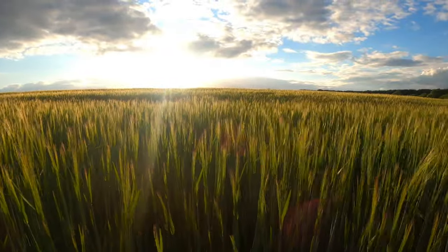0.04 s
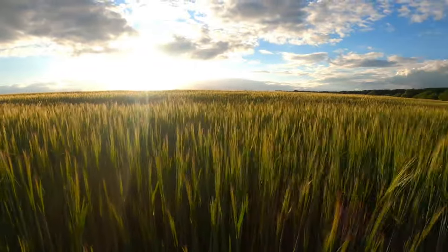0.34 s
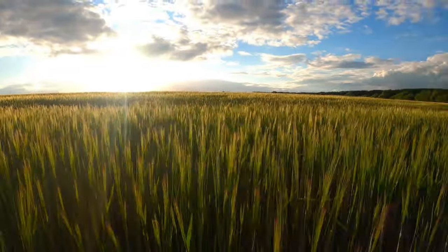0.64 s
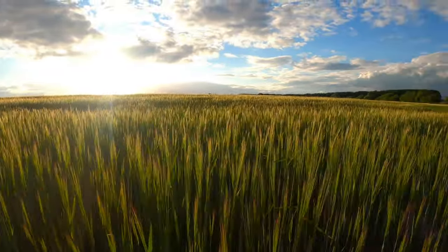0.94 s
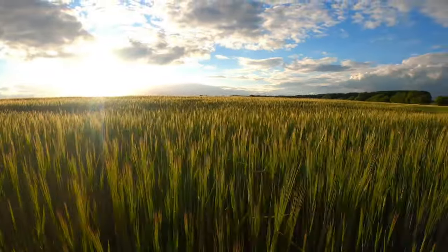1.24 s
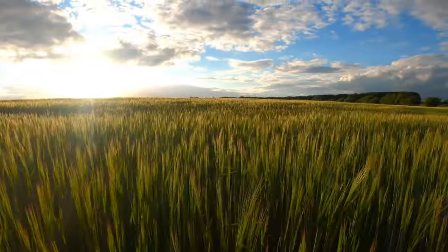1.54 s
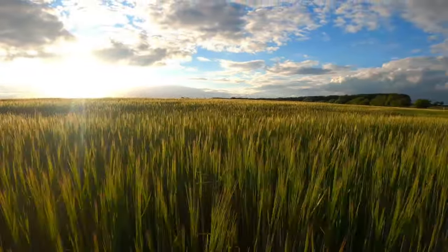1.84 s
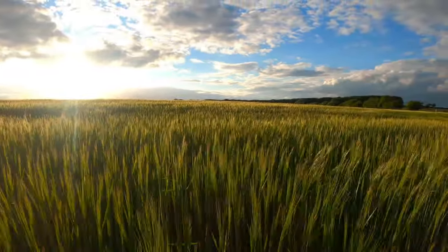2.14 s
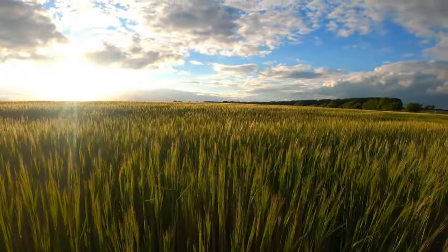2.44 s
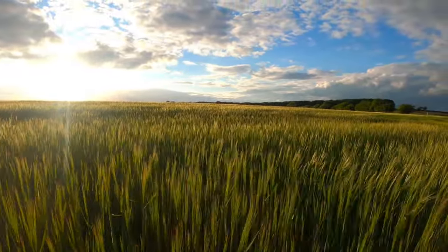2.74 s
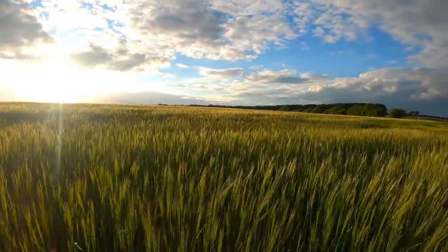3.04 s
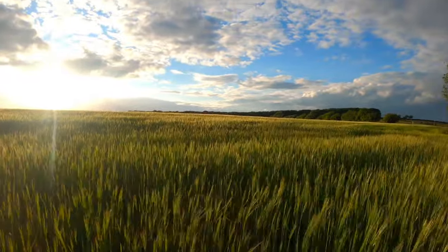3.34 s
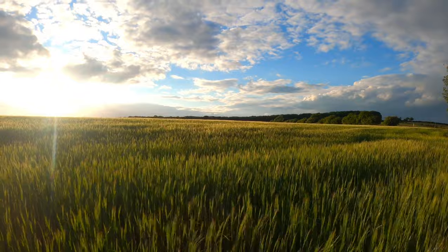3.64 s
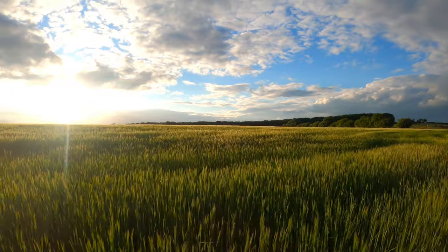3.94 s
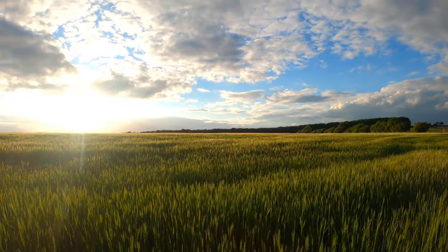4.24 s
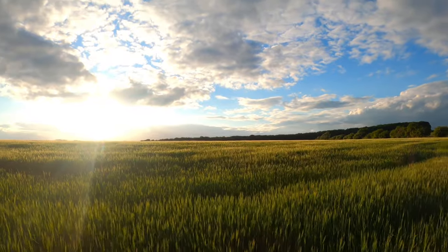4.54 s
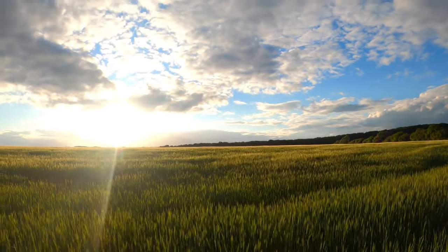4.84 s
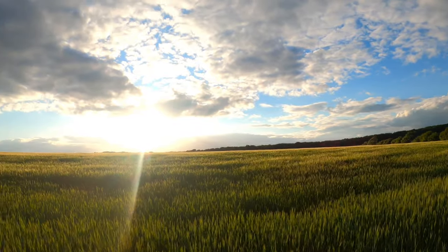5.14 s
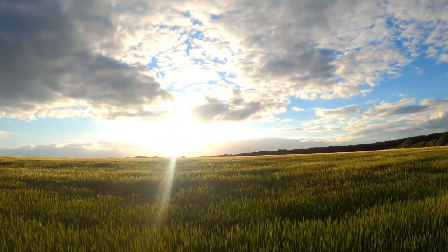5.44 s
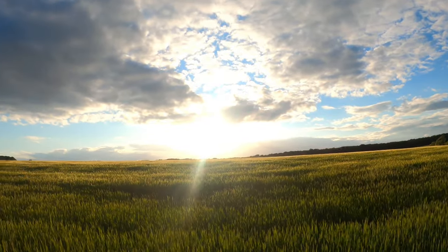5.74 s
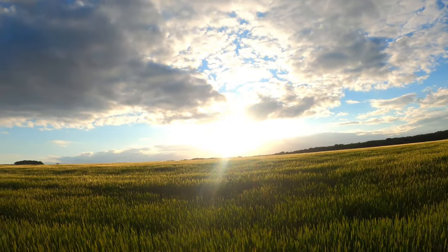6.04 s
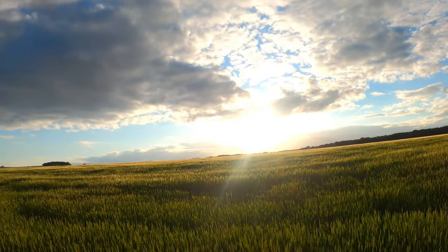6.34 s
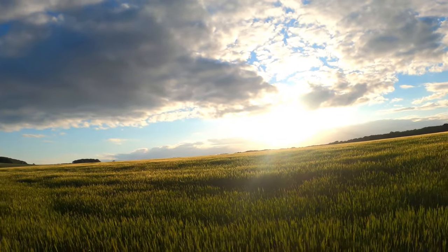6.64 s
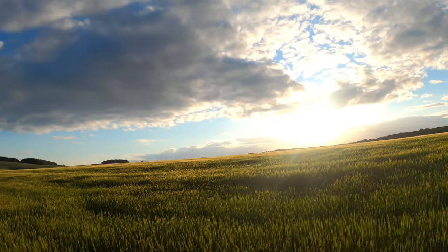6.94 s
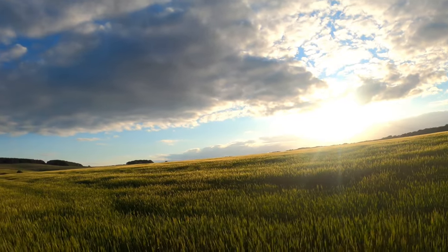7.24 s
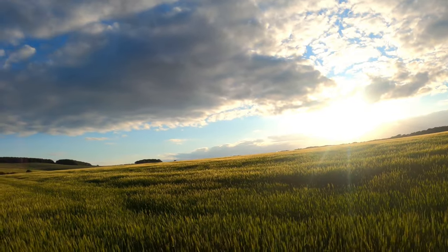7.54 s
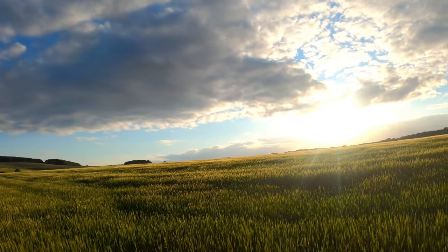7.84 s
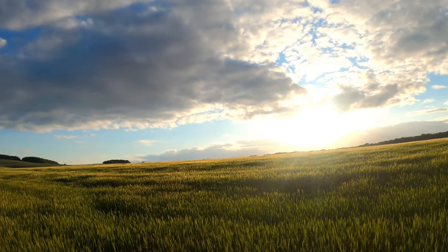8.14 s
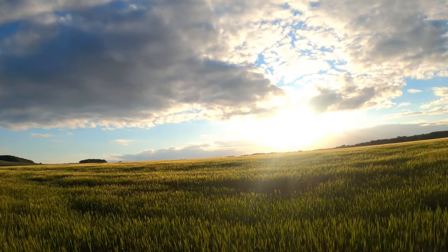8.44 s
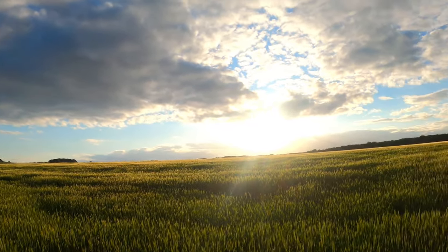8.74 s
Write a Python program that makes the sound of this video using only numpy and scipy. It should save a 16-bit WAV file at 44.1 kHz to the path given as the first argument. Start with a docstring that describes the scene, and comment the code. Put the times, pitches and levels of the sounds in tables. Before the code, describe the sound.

Wind buffets the microphone in gusts as songbirds warble and twitter continuously over the faint hiss of a barley field.

```python
"""At the edge of a barley field, the crop hisses softly and gusts buffet the microphone.
Over this, songbirds sing fast, overlapping phrases: thin high whistles, quick warbles,
low fluted notes, runs of twittering and one short buzz.
Each note is one gliding tone that scatters back from the trees and lingers."""
import sys
import numpy as np
from scipy import signal
from scipy.fft import rfft, irfft, next_fast_len
from scipy.io import wavfile
from scipy.ndimage import uniform_filter1d, map_coordinates

SR = 44100
rng = np.random.default_rng(int(sys.argv[2]) if len(sys.argv) > 2 else 0)


def generate_wav(signal):
    """Clip the signal to [-1, 1] and save it as 16-bit WAV at the path in sys.argv[1]."""
    frames = np.transpose(np.atleast_2d(signal))
    scaled = np.clip(frames, -1, 1) * 32767
    pcm = np.round(scaled).astype(np.int16)
    wavfile.write(sys.argv[1], SR, pcm)


N = 392534
TIME = np.arange(N) / SR
ALONG = np.linspace(0, 1, 25)  # a note's progress, from start (0) to end (1)


def undb(db):
    """Turn decibels into a gain."""
    return 10 ** (np.asarray(db) / 20)


def unit(x):
    """Scale a sound to an average power of one."""
    return x / np.sqrt(np.mean(x ** 2))


def wander(rate_hz):
    """A smooth random wobble around zero, about 1 in size."""
    hold = max(int(SR / rate_hz), 2)
    steps = np.repeat(rng.standard_normal(8000)[:N // hold + 1], hold)
    return 1.26 * uniform_filter1d(uniform_filter1d(steps, hold), hold)[:N]


def band_noise(low_hz, high_hz, order=2):
    """Noise between two frequencies."""
    band = signal.butter(order, [low_hz, max(high_hz, 1.1 * low_hz)], "band", fs=SR, output="sos")
    return unit(signal.sosfilt(band, rng.standard_normal(N)))


# tone colour of the hiss: (frequency [Hz], relative level [dB])
HISS_COLOUR = [(60, -6.5), (250, -1), (500, -1), (1100, -.5), (2000, -3.5), (3500, -6), (5500, -14.5),
               (8000, -19.5), (12000, -24), (15500, -29.5)]
# its loudness: (time [s], level [dB])
HISS_LEVELS = [(0, -65.5), (7.5, -64.5), (8.9, -70)]
def barley(swell_db):
    """Countless rustling stalks merge into a smooth hiss that swells slowly."""
    hz, shape_db = np.transpose(HISS_COLOUR)
    size = next_fast_len(N)
    spectrum = rfft(rng.standard_normal(size))
    colour_db = np.interp(np.log(np.linspace(1, SR / 2, len(spectrum))), np.log(hz), shape_db)
    hiss = unit(irfft(spectrum * undb(colour_db), size)[:N])
    level_db = np.interp(TIME, *np.transpose(HISS_LEVELS)) + swell_db * wander(1.7)
    return hiss * undb(level_db)


def gust(start, end, build_s=0.084, fade_s=0.11):
    """A gust's strength: it builds, holds and dies away."""
    return np.exp(-np.maximum(start - TIME, 0) / build_s - np.maximum(TIME - end, 0) / fade_s)


# gusts: (start [s], end [s], rumble level [dB], flutter level [dB])
WIND_GUSTS = [(0.338, 0.767, -46.5, -47.5), (1.03, 1.246, -56, -60.5), (1.377, 1.65, -50, -53),
              (1.77, 1.887, -46, -50), (2.447, 2.84, -43.5, -49), (2.978, 3.07, -45, -49.5),
              (3.403, 3.726, -49.5, -55.5), (3.842, 4.07, -45.5, -54), (4.375, 4.73, -48, -55),
              (4.907, 5.354, -50.5, -65), (5.477, 5.66, -48, -59), (5.785, 6.09, -55.5, -73),
              (6.86, 7.283, -50, -50), (7.44, 7.817, -49, -53.5), (7.894, 8.32, -53.5, -60.5),
              (8.468, 8.637, -48.5, -52.5)]
# single thumps of air: (time [s], length [s], level [dB], upper edge [Hz])
WIND_THUMPS = [(0.387, 0.053, -49, 230), (.515, 0.052, -42.5, 350), (0.531, .03, -53, 656),
               (.6, 0.021, -38.5, 185), (0.675, 0.022, -43.5, 270), (1.828, 0.038, -45, 250),
               (2.57, .06, -57.5, 320), (3.036, 0.027, -52, 250), (4.013, 0.048, -58.5, 320),
               (4.494, 0.019, -54, 285), (7.16, 0.26, -63, 254), (7.622, .12, -57.5, 260),
               (8.578, 0.18, -56.5, 274)]
def wind():
    """Big swirls of air rumble on the microphone; small ones flutter and sometimes strike hard."""
    rumble_db, flutter_db = -64.5, -79  # the breeze between gusts
    for start, end, low_db, high_db in WIND_GUSTS:
        fade_db = 20 * np.log10(gust(start, end))
        rumble_db = np.maximum(rumble_db, low_db + fade_db)
        flutter_db = np.maximum(flutter_db, high_db + 1.7 * fade_db)  # flutter dies sooner
    swirls = 2.22 * np.tanh(wander(30) / 1.32)  # air speed swings within limits
    rumble = band_noise(13.6, 70.6, order=6) * undb(rumble_db + 0.86 * swirls)
    flutter = band_noise(71.3, 121.8, order=5) * undb(flutter_db + 3.8 * swirls - 3.5)
    # the smallest swirls grow fastest with the gust
    rasp = band_noise(108.5, 190.7) * undb(-55.5 + 1.55 * (flutter_db + 46.5) + 5.2 * swirls)
    out = rumble + flutter + rasp
    for centre, length, db, edge_hz in WIND_THUMPS:
        swell = np.exp(-(2 * (TIME - centre) / length) ** 2)
        out += band_noise(85, edge_hz, order=3) * undb(db) * swell
    return out


def trees(song, early_db, early_s, late_db, late_s, dull_hz=6600):
    """Add echoes: near leaves answer at once, far trunks later. Each fades 60 dB in its given time."""
    t = TIME[:2 * SR]
    near, far, grain = rng.standard_normal((3, len(t)))
    early = near * undb(-60 * t / early_s) * (1 - np.exp(-t / 0.0033))
    late = far * grain ** 2 * undb(-60 * t / late_s) * (1 - np.exp(-t / 0.022))
    echo = undb(early_db) * early / np.linalg.norm(early) + undb(late_db) * late / np.linalg.norm(late)
    # leaves and air swallow the highest notes
    echo = signal.sosfilt(signal.butter(2, dull_hz, fs=SR, output="sos"), echo)
    # shaking leaves vary the echo's delay and blur its pitch
    heard_at = TIME + 0.00007 * wander(109.9)
    return song + map_coordinates(signal.fftconvolve(song, echo)[:N], [heard_at * SR])


def tone(hz, fade, max_attack_s=0.01):
    """A pure whistle that opens quickly; fade is the share of it spent dying away."""
    u = np.linspace(0, 1, len(hz))
    attack = min(fade, max_attack_s * SR / len(hz))
    opening = np.clip(np.minimum(u / attack, (1 - u) / fade), 0, 1)
    return np.sqrt(2) * np.sin(np.pi / 2 * opening) * np.sin(2 * np.pi * np.cumsum(hz) / SR)


def glide(pitches, size):
    """A smooth curve through a list of pitches."""
    place = np.linspace(0, len(pitches) - 1, size)
    k = np.minimum(place.astype(int), len(pitches) - 2)
    u, step, slope = place - k, np.diff(pitches)[k], np.gradient(pitches)
    bend = (1 - u) * (slope[k] - step) - u * (slope[k + 1] - step)
    return pitches[k] + u * step + u * (1 - u) * bend


def sing(notes, fade, waver, shimmer_db, sweep_hz_per_s=50000):
    """Play notes (start, length, level, pitches...) as unsteady glides, weaker where they move fast."""
    out = np.zeros(N)
    tension = 1 + waver * wander(300)
    pressure = undb(shimmer_db * wander(120))
    for start, length, db, *pitches in notes:
        span = slice(max(int(start * SR), 0), min(int((start + length) * SR), N))
        hz = glide(np.array(pitches, float), span.stop - span.start)
        strength = 1 / np.sqrt(1 + np.abs(np.gradient(hz)) * SR / sweep_hz_per_s)
        out[span] += undb(db) * unit(tone(hz * tension[span], fade) * strength * pressure[span])
    return out


# runs of chirps: (start [s], end [s], rate [1/s], lowest [Hz], highest [Hz],
# typical chirp length [s], level [dB])
CHIRP_RUNS = [(0, 2.2, 24, 2500, 4500, .06, -65), (0, 2.2, 12, 3900, 6400, 0.032, -79.5),
              (1.6, 2.65, 20, 1800, 3000, 0.014, -62.5), (2, 3.3, 38, 3900, 5500, 0.0227, -62),
              (2.25, 3.95, 28, 2700, 4400, 0.01276, -54), (5.5, 7.1, 16, 2600, 4400, .035, -72.5),
              (7.15, 8.85, 26, 2900, 5000, .04, -67), (6.5, 7.4, 40, 1650, 2900, 0.0253, -61),
              (7.3, 7.9, 16, 1400, 2300, .05, -64), (1.6, 7.3, 3, 6500, 8500, 0.078, -82)]
def twitter(scatter_db):
    """Short chirps of random shape at a loose pace."""
    notes = []
    for start, end, rate, low_hz, high_hz, length, db in CHIRP_RUNS:
        chance = rng.random((100, 6))
        for beat, (late, stretch, loud, *shape) in zip(np.arange(start, end, 1 / rate), chance):
            pitches = low_hz + (high_hz - low_hz) * np.array(shape)
            level_db = db + scatter_db * (2 * loud - 1)
            notes.append((beat + late / rate / 2, length * (.5 + stretch), level_db, *pitches))
    return notes


def trill(start, length, centre_hz, depth_hz, rate_hz, db):
    """A high buzz: the pitch jumps up and slides down many times a second."""
    turn = 2 * np.pi * rate_hz * np.arange(int(length * SR)) / SR
    hz = centre_hz + depth_hz * (np.sin(turn) + np.sin(2 * turn) / np.pi)
    buzz = tone(hz, fade=.2) * (1 - .5 * np.cos(turn))  # jumps are quieter than slides
    first = int(start * SR)
    return undb(db) * np.pad(buzz, (first, N - first - len(hz)))


def shaped(table, curve):
    """Give every note in a table the same kind of pitch curve."""
    return [(start, length, db, *curve(*hz)) for start, length, db, *hz in table]


# notes with a peak: (start [s], length [s], level [dB], top pitch [Hz])
PEEP_NOTES = [(.013, .04, -61.5, 7200), (.137, 0.052, -57.5, 7510), (.215, 0.034, -64, 7260),
              (.315, 0.12, -66, 6830), (.465, 0.033, -59.5, 7250), (.574, 0.07, -59, 7470),
              (.668, .024, -64, 7060), (.854, 0.055, -61, 7000), (.98, 0.16, -62, 7200),
              (4.897, 0.0484, -54, 4460)]
ARCH_NOTES = [(.762, 0.055, -61, 6580), (1.761, 0.082, -60, 5530), (1.886, 0.037, -60, 5630),
              (1.956, 0.048, -59.5, 5480), (2.04, 0.066, -61.5, 5930), (2.155, .03, -60.5, 5410),
              (2.3, 0.076, -62.5, 5630), (2.525, 0.051, -62, 5460), (2.69, 0.028, -67, 5600),
              (3.125, 0.059, -67, 5830), (2.789, 0.051, -56.5, 4350), (3.086, 0.018, -46, 3790),
              (3.176, 0.018, -51, 3500), (3.46, 0.063, -59, 4630), (3.503, 0.019, -46.5, 3510),
              (3.635, 0.071, -63, 5020), (5.81, .07, -70, 3800), (8, .055, -56.5, 4960),
              (8.558, 0.065, -52.5, 4650), (8.768, 0.048, -57, 4610)]
def arches(peak_at=0.287, climb=0.608, peep_drop_hz=220, arch_drop=.25):
    """A quick climb and a longer fall; thin peeps barely bend."""
    before = climb * (1 - ALONG / peak_at) ** 2
    after = np.abs((ALONG - peak_at) / (1 - peak_at)) ** 1.3
    sag = np.where(ALONG < peak_at, before, after)
    return (shaped(PEEP_NOTES, lambda top: top - peep_drop_hz * sag)
            + shaped(ARCH_NOTES, lambda top: top * (1 - arch_drop * sag)))


# sliding notes: (start [s], length [s], level [dB], from [Hz], towards [Hz])
DIVE_NOTES = [(.024, 0.06, -53.5, 3200, 2610), (.35, 0.1, -58.5, 3920, 2950), (.555, .06, -55, 4035, 3000),
              (.73, 0.072, -56, 4050, 3040), (3.42, .115, -48, 2427, 2190),
              (4.227, 0.098, -55.5, 3527, 2790), (4.388, 0.061, -57, 3030, 2465),
              (4.487, 0.03, -55.5, 5410, 5280), (4.615, .073, -48, 4085, 3094),
              (5.13, .18, -54, 2383, 2145), (6.04, 0.12, -84, 7300, 6400), (7.07, 0.15, -51.5, 2723, 2637),
              (7.561, .105, -64, 5630, 3880), (7.585, 0.1, -55, 1982, 1372), (7.77, .102, -58, 5270, 3610),
              (8.295, 0.068, -54.5, 2840, 2763), (8.32, .05, -56, 5010, 3320)]
CLIMB_NOTES = [(.167, 0.14, -60, 3050, 3910), (1.297, 0.055, -58.5, 3020, 4300),
               (1.425, 0.057, -55.5, 3140, 4350), (1.553, 0.041, -55, 3095, 4210),
               (1.77, 0.0605, -60.5, 3020, 3420), (3.775, .16, -52, 3724, 3850),
               (3.975, 0.14, -45, 3110, 4040), (4.09, 0.048, -62.5, 4050, 4940),
               (4.733, 0.033, -42.5, 3350, 3475), (5.199, .06, -65, 3175, 3500),
               (7.22, 0.17, -73, 4360, 5600), (7.66, 0.086, -68.5, 3390, 4420),
               (7.94, 0.11, -61, 4410, 4680), (7.775, 0.094, -57, 1601, 2246),
               (8.125, 0.041, -51, 3860, 4580), (8.165, .042, -52, 4726, 4950),
               (8.385, 0.076, -53, 3760, 4550), (8.526, .04, -60, 3400, 4300),
               (8.692, 0.058, -52, 3300, 3470)]
SLUR_NOTES = [(.884, 0.098, -58.5, 4100, 3480), (1.097, 0.12, -60.5, 4370, 3540),
              (1.375, 0.064, -66.5, 5900, 4560), (1.568, 0.03, -60, 6200, 5550),
              (1.614, 0.082, -63.5, 5920, 5710), (1.67, 0.072, -57, 2954, 2990),
              (3.322, 0.1076, -47, 2740, 2400), (3.684, .17, -49, 2660, 2337),
              (5.036, 0.084, -53, 2700, 2430), (5.369, 0.044, -65, 3330, 2760),
              (5.575, 0.038, -68.5, 3370, 2750), (7.235, 0.081, -55, 2280, 1530),
              (7.36, 0.11, -72.5, 7500, 6100), (8.4, 0.082, -60.5, 1720, 1580),
              (8.569, 0.11, -58.5, 2520, 1983)]
def slides():
    """Dives fall and climbs rise ever faster; slurs move at once, then settle."""
    return (shaped(DIVE_NOTES, lambda first, last: first + (last - first) * ALONG ** 1.9)
            + shaped(CLIMB_NOTES, lambda first, last: first + (last - first) * ALONG ** 2.1)
            + shaped(SLUR_NOTES, lambda first, last: last + (first - last) * np.exp(-ALONG / .3)))


# very short notes: (start [s], length [s], level [dB], first pitch [Hz])
UP_FLICKS = [(.295, 0.023, -71, 5300), (.945, .045, -69, 5800), (2.212, 0.011, -52, 2900),
             (2.23, 0.024, -49, 3164), (2.311, 0.02, -52, 3480), (2.434, 0.027, -50.5, 3280),
             (2.494, .03, -57, 3780), (2.575, 0.048, -57, 3800), (2.999, .014, -51, 3050),
             (3.279, 0.0091, -49.5, 3230), (3.317, .011, -53, 3180), (3.612, 0.016, -46, 3130),
             (4.783, 0.023, -58, 3720), (5.03, .018, -50.5, 3400), (5.26, .03, -65, 3800),
             (8.207, 0.021, -60, 4780), (8.75, .025, -56.5, 3560)]
DOWN_FLICKS = [(.505, .022, -66, 5930), (.685, .02, -68, 6030), (2.345, 0.0085, -58, 4370),
               (2.684, 0.013, -50, 3720), (3.593, 0.012, -52, 3860), (3.643, 0.0094, -44.5, 3930),
               (3.732, 0.025, -48, 3730), (4.202, .024, -65, 6060), (4.345, 0.021, -66, 7130),
               (4.42, 0.017, -64, 6360), (4.526, 0.018, -55.5, 5220), (4.838, 0.019, -54, 4530),
               (4.965, 0.019, -53, 4500), (6.285, 0.033, -64, 2580), (6.505, 0.026, -61, 2490)]
def flicks(up_ratio=1.29, down_ratio=.74):
    """Quick strokes up or down in pitch."""
    return (shaped(UP_FLICKS, lambda first: first * up_ratio ** ALONG)
            + shaped(DOWN_FLICKS, lambda first: first * down_ratio ** ALONG))


# two-part notes: (start [s], rise level [dB], top [Hz], slur length [s], slur level [dB], end [Hz])
YODEL_NOTES = [(2.819, -49, 2930, 0.051, -48, 2310), (3.038, -52.5, 2980, 0.14, -50.5, 2085),
               (4.494, -50, 2950, 0.056, -50, 2278), (4.726, -48.5, 2980, 0.14, -53.5, 2052),
               (5.792, -53, 3024, 0.057, -49, 2318), (6.646, -49, 2970, 0.037, -50, 1976),
               (6.824, -47, 2925, 0.039, -51, 1852), (6.998, -47.5, 2933, 0.035, -49, 2040)]
def yodels(rise_s=.034, rise_hz=532, break_hz=2698, settle_s=0.00514):
    """A short fluted rise breaks into a low slur."""
    notes = []
    for start, rise_db, top, length, slur_db, last in YODEL_NOTES:
        rise = top - rise_hz * (1 - ALONG) ** 1.555
        slur = last + (break_hz - last) * np.exp(-ALONG * length / settle_s)
        notes += [(start, rise_s, rise_db, *rise), (start + rise_s, length, slur_db, *slur)]
    return notes


def voice(low_hz, high_hz):
    """The notes whose average pitch lies in one range."""
    notes = arches() + slides() + flicks() + yodels()
    return [note for note in notes if low_hz <= np.mean(note[3:]) < high_hz]


def birds(low_hz=2880, high_hz=4250):
    """High, middle and low voices plus twittering; lower voices ring longer among the trees."""
    whistles = sing(voice(high_hz, SR / 2), fade=0.17, waver=0.0047, shimmer_db=3)
    whistles += trill(start=1.205, length=.175, centre_hz=7220, depth_hz=278, rate_hz=65, db=-63)
    warbles = sing(voice(low_hz, high_hz), fade=0.12, waver=0.013, shimmer_db=3.5)
    flutes = sing(voice(0, low_hz), fade=0.14, waver=0.0045, shimmer_db=2.1)
    chirps = sing(twitter(scatter_db=3.5), fade=0.36, waver=0.0154, shimmer_db=0)
    return (undb(-1.5) * trees(whistles, early_db=-2, early_s=0.3, late_db=-5, late_s=0.78)
            + undb(-0.4) * trees(warbles, early_db=-4.5, early_s=0.25, late_db=-7.5, late_s=1)
            + undb(-1.6) * trees(flutes, early_db=-4, early_s=0.2, late_db=-4, late_s=1.69)
            + undb(-4) * trees(chirps, early_db=-0.5, early_s=0.25, late_db=-1.5, late_s=0.73))


def scene():
    """Birds, wind and barley at one microphone."""
    return (birds() + wind() + barley(swell_db=1.34))[None]


def record(dry):
    """The recorder cuts the treble above 15700 Hz."""
    return signal.sosfilt(signal.ellip(10, .2, 70, 15700, fs=SR, output="sos"), dry)


dry = scene()
out = record(dry)
generate_wav(out)
```